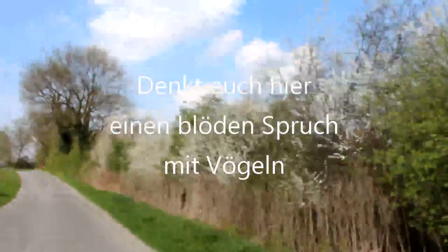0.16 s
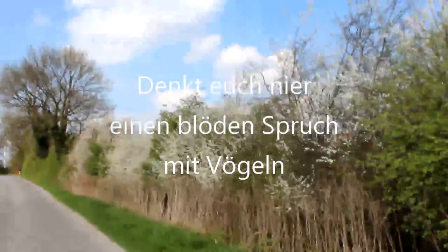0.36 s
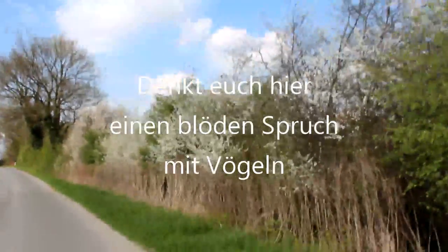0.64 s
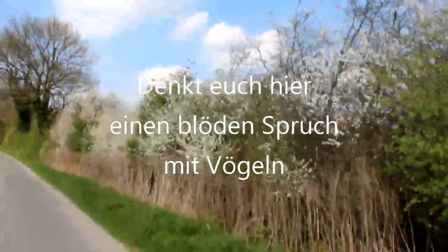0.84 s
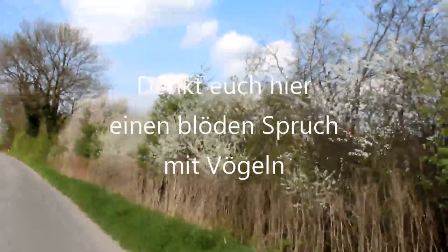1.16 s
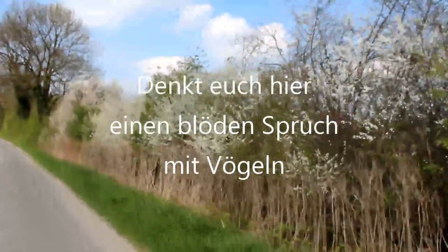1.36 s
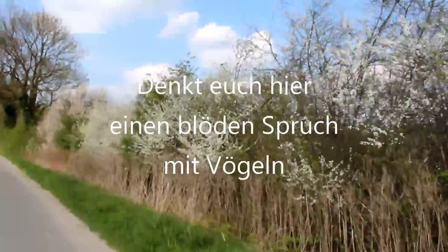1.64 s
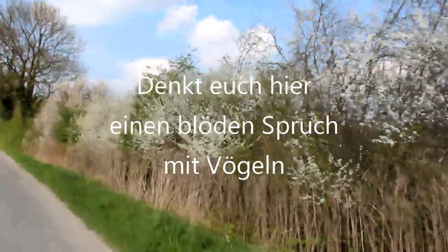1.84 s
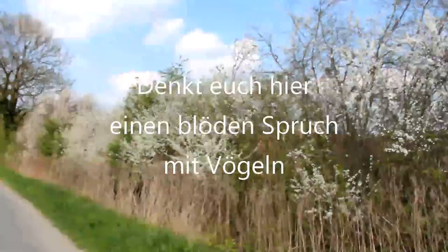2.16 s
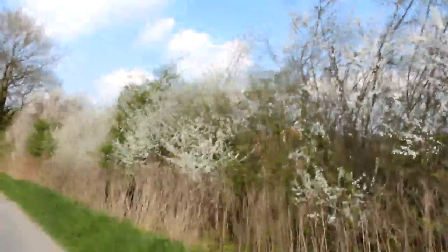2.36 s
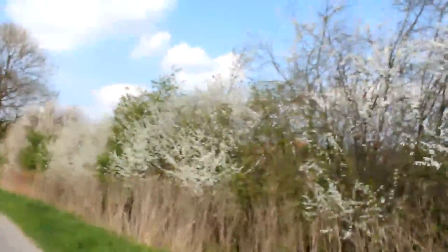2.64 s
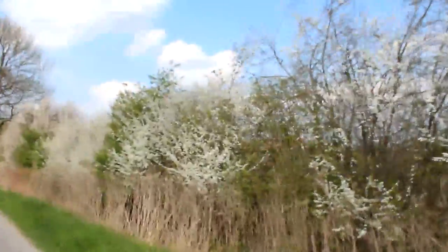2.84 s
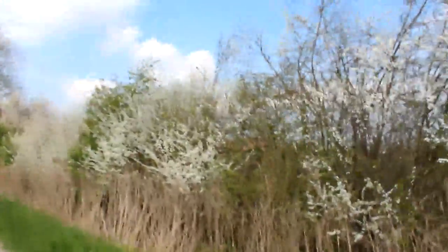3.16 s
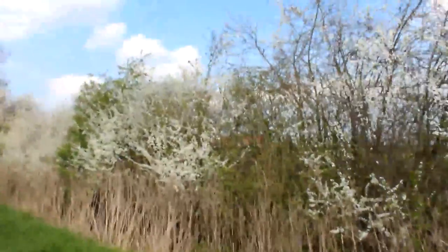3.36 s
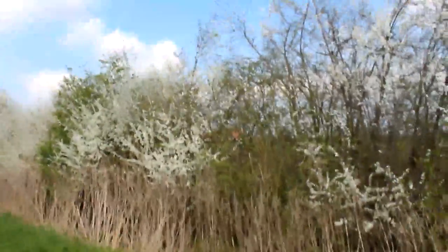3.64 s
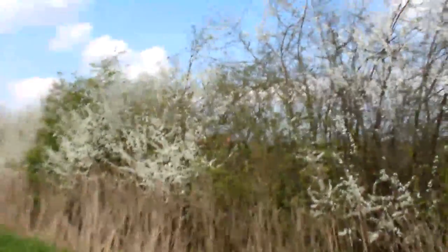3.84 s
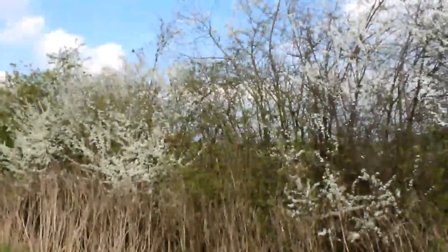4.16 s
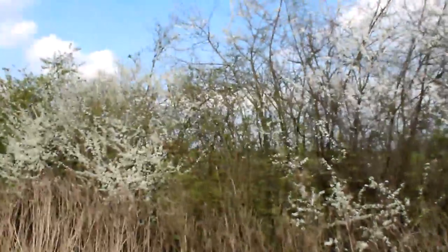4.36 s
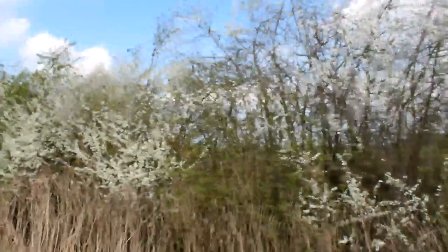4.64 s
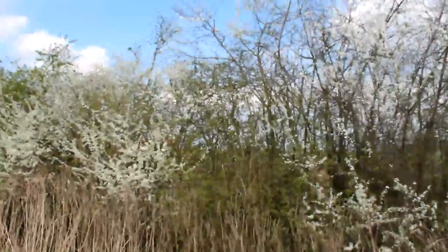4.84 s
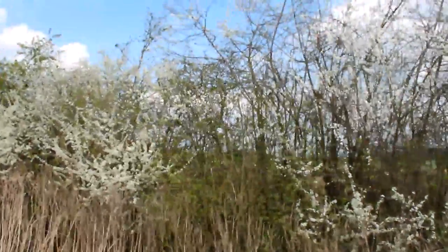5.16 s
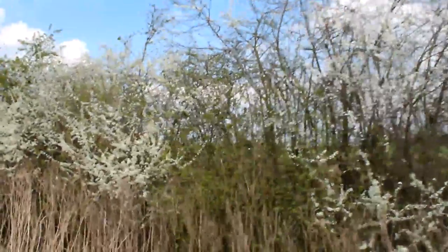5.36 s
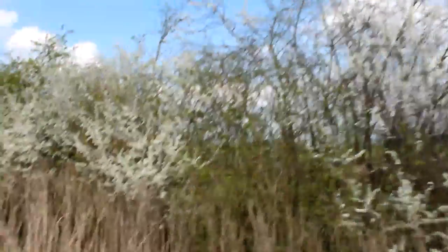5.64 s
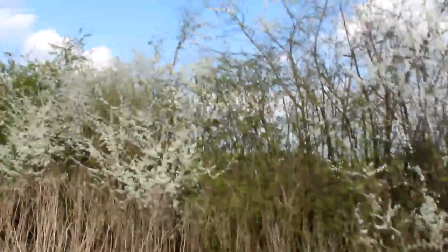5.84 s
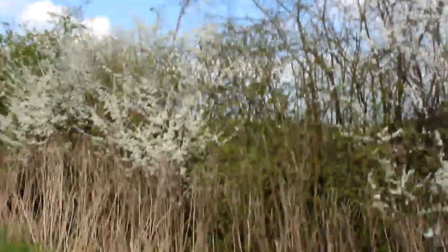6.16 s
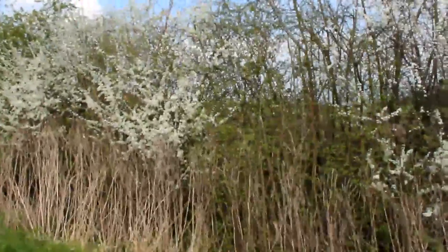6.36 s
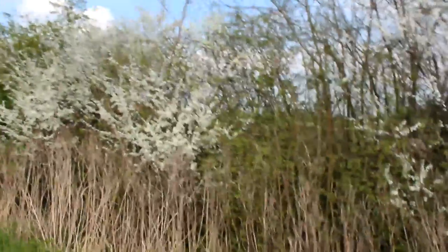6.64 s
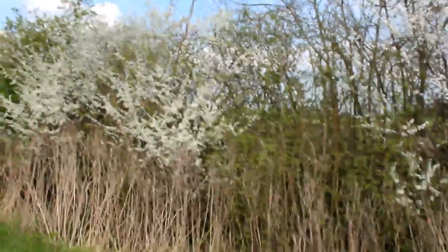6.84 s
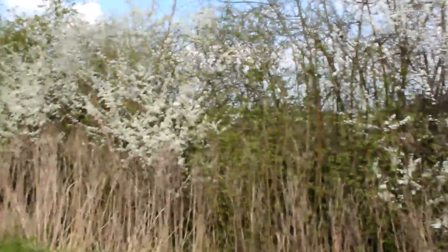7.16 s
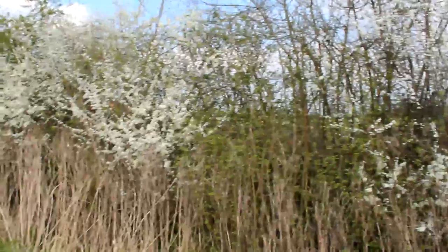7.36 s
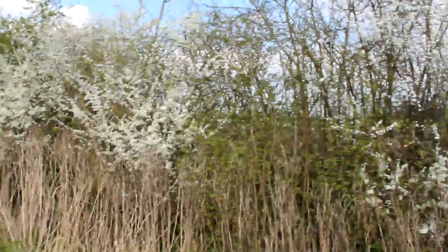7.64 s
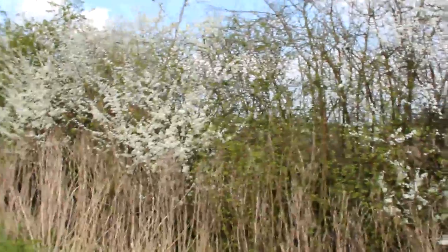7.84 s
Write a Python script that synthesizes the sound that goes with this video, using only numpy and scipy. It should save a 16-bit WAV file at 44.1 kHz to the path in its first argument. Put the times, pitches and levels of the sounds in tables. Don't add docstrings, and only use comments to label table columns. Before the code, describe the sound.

A small group of sparrows chatters irregularly in a hedge, thin whistled chirps slightly blurred by twigs. At first, rumbling wind puffs hit the microphone hard and partly cover quiet birds. After about four seconds the air calms and stronger chirps stand out, with dull handling bumps, fingernail-like taps, tiny snaps and soft brushing of leaves. Dry reeds hiss very softly above a distant low hum. Close, open, handheld sound.

```python
import sys
import numpy as np
from scipy import signal
from scipy.fft import rfft, irfft, next_fast_len
from scipy.io import wavfile
from scipy.ndimage import uniform_filter1d

SR = 44100
rng = np.random.default_rng(int(sys.argv[2]) if len(sys.argv) > 2 else 0)


def field_ratio(decibels):
    return 10 ** (np.asarray(decibels, dtype=float) / 20)


def generate_wav(sig):
    pcm = np.round(np.clip(np.atleast_2d(sig).T, -1, 1) * 32767).astype(np.int16)
    wavfile.write(sys.argv[1], SR, pcm)


N = 352888

# [t after start/s, f/Hz, effort/dB]
HUMP = [
    [(-.005, 2007, -21), (.01, 2565, -17.5), (.022, 3353, -4.5), (.033, 3530, 4.5), (.045, 3440, -5.5),
     (.052, 2645, -7.5), (.062, 2874, -8.5), (.08, 2663, -7.5), (.097, 2004, -15)],
    [(.016, 3300, -16), (.033, 4165, -5.5), (.047, 3940, -11)],
]
TWIN_PEAK = [
    [(.005, 2940, -28), (.02, 4200, 1.5), (.033, 5080, -4), (.045, 3923, 4), (.057, 3765, -12)],
    [(-.02, 4250, -19), (-.003, 4550, -17.5), (.01, 5670, -4)],
    [(-.015, 3450, -18), (.006, 4150, -24)],
    [(-.004, 2265, -23), (.008, 2920, -25)],
    [(.063, 2860, -17), (.078, 3410, -1.5), (.09, 3950, -5.5), (.102, 2873, -12), (.125, 3240, -13.5),
     (.16, 3070, -19.5)],
]
SPIKE = [
    [(.003, 3556, -14), (.035, 4406, -5.5), (.056, 4876, -10), (.062, 5880, -12.5), (.069, 4300, -4),
     (.09, 3815, 0), (.1, 3354, -12.5)],
]
SPIKE_TAIL = [
    [(.1, 3250, -5), (.13, 3352, -26), (.142, 3440, -4), (.153, 3967, -1.5), (.172, 4200, -1.5),
     (.195, 4220, -17)],
    [(.095, 4150, -26), (.12, 4030, -4), (.145, 4260, -13)],
]
ZIGZAG = [
    [(.005, 2920, -4.5), (.025, 4850, 7), (.043, 5460, -13.5), (.06, 3886, 8), (.075, 3060, -1.5),
     (.088, 2620, -16)],
    [(-.028, 5050, -13), (-.01, 5680, -13), (.006, 5970, -6.5)],
    [(.092, 2656, -2.5), (.11, 3640, 7), (.127, 4700, -3), (.137, 3100, 3), (.155, 2450, -8)],
]
ARCH_STEP = [
    [(.005, 2840, -14), (.02, 4040, 5.5), (.035, 4637, 3), (.05, 3705, 3.5), (.062, 2863, -10),
     (.08, 3094, 4), (.1, 3020, -18), (.125, 2380, -14.5)],
    [(-.024, 4400, -9), (-.003, 4450, -9), (.012, 5670, -2)],
    [(-.02, 5100, -12), (0, 5360, -9)],
    [(-.024, 2220, -28), (0, 2470, -16)],
]
CASCADE = [
    [(.003, 3424, -22), (.013, 4590, -12), (.024, 5100, -8), (.032, 3715, -10.5), (.038, 4180, -7.5),
     (.045, 3100, -23)],
    [(.048, 3270, -6), (.06, 4010, -4), (.075, 3350, -4.5), (.082, 2713, -14.5), (.09, 3010, -7.5),
     (.1, 2860, -17), (.12, 2220, -21.5)],
]
TOOTH = [
    [(-.03, 4450, -19), (-.005, 5420, -8.5), (.02, 7800, -18)],
    [(.003, 2800, -13), (.02, 4340, 3), (.033, 4450, 3), (.042, 5150, -3.5), (.055, 3700, 5.5)],
    [(-.012, 2680, -17), (.02, 2730, -20), (.042, 3370, -9), (.055, 2870, -11)],
]
RATTLE = [
    [(.002, 3788, -3), (.01, 4670, -1), (.028, 4350, -1), (.033, 3115, -7.5), (.041, 4110, 0),
     (.048, 2940, -4)],
    [(.05, 2876, -23), (.055, 2150, -16.5), (.06, 3114, -6.5), (.08, 3965, -0.5), (.086, 4400, -1),
     (.092, 2664, -18), (.102, 3560, -8.5), (.112, 3100, -10), (.125, 2900, -16)],
]
SHOULDER = [
    [(.005, 3120, -15.5), (.015, 4000, -13.5), (.038, 4600, -8), (.042, 5280, -20.5), (.048, 3670, -6.5),
     (.067, 3230, -27)],
    [(.077, 2900, -13.5), (.098, 3856, -8), (.115, 3090, -10), (.13, 2320, -20)],
]
HOOK = [
    [(.002, 2953, -8), (.01, 4250, -0.5), (.028, 3870, 0), (.045, 3280, -1), (.05, 4270, 4),
     (.058, 2700, -7), (.078, 2840, -1), (.092, 3500, 4.5)],
    [(.1, 2990, -3), (.135, 3480, -12), (.16, 2960, -6.5)],
    [(.052, 4590, -7), (.085, 3760, -3.5)],
]
FLICK = [
    [(.01, 3010, -14), (.025, 4250, -0.5), (.037, 4650, -5.5), (.043, 2950, -4), (.06, 3350, -4),
     (.08, 3020, -7)],
]
DROP = [
    [(.015, 3290, 0), (.021, 5110, -1.5), (.055, 4140, -5), (.065, 2880, -3.5), (.09, 3100, -6),
     (.12, 3280, 0)],
]
STAIRS = [
    [(.015, 3250, -5), (.03, 4070, -2), (.045, 3510, -5.5), (.05, 4620, 0), (.056, 2930, -8),
     (.075, 3000, -3.5), (.095, 2850, -12.5), (.14, 2760, -25)],
    [(.097, 2530, -13), (.115, 2150, -19), (.14, 2090, -23)],
    [(-.002, 4830, -14), (.012, 5570, -10), (.019, 5950, -14)],
]
TRILL = [
    [(.005, 3290, -10), (.02, 4500, -2), (.034, 5540, -8), (.048, 5720, -9), (.058, 3450, 4),
     (.075, 5460, -2)],
    [(.08, 3300, 2), (.095, 4830, -0.5), (.13, 4790, -6)],
    [(.1, 5170, -2.5), (.17, 5074, -13)],
    [(.008, 3100, -12), (.022, 3950, -5), (.036, 4100, -10)],
]
LEDGE = [
    [(0, 3440, -8), (.01, 5120, 6.5), (.025, 4920, -20), (.032, 6070, -9), (.042, 4200, -8),
     (.07, 3770, -6)],
]
DOUBLE_BOW = [
    [(.005, 3695, -1), (.028, 3750, -1.5), (.042, 2730, -2)],
    [(.05, 2860, -3), (.065, 3400, -2), (.08, 2790, -4), (.1, 2830, -21)],
]
SAWTOOTH = [
    [(.008, 2800, -11.5), (.022, 3940, -1.5), (.037, 4270, -8), (.042, 4700, -4), (.052, 3290, 2.5)],
    [(.022, 2710, -14), (.036, 3170, -5), (.042, 3800, 2.5), (.047, 3100, -1), (.06, 2750, -11)],
]
ARCH = [
    [(0, 2690, -10), (.02, 3250, -8), (.035, 3680, -2.5), (.058, 3770, -1.5), (.08, 3520, -2),
     (.1, 3100, -12), (.115, 2820, -3), (.132, 2580, -12)],
]
PAIR = [
    [(0, 3635, -8), (.025, 4460, 6)],
    [(0, 4500, -4), (.025, 5320, 3)],
]
WARBLE = [
    [(0, 5950, -4), (.012, 6200, -3), (.035, 5900, -5), (.045, 6150, -6), (.062, 6660, 0), (.095, 6250, -7),
     (.11, 6520, -3), (.14, 6600, -10)],
    [(.088, 5550, 5), (.1, 5910, 4), (.135, 5900, -15)],
]
LEAP = [
    [(0, 2300, -25), (.014, 3790, -1), (.028, 4270, 2.5), (.034, 4680, -5), (.042, 3710, 4),
     (.052, 3570, 1.5), (.057, 2910, -7.5), (.085, 2820, -8.5), (.105, 2470, -9)],
    [(-.025, 4150, -19), (-.005, 4100, -10), (.006, 4580, -10), (.013, 5900, -11)],
    [(-.02, 4670, -18), (.008, 5200, -13)],
]
CROOK = [
    [(0, 2752, -9), (.012, 3460, 3), (.022, 4140, -4), (.033, 4500, -7), (.047, 2710, -16.5)],
]
LEAN = [
    [(0, 4000, -2), (.015, 5260, 2), (.04, 5800, -5), (.052, 3760, 5)],
]


def rms_one(x):
    return x / np.sqrt(np.mean(x ** 2) + 1e-20)


def drift(rate_hz):
    r = np.exp(-2 * np.pi * rate_hz / SR)
    noise = rng.standard_normal(N + SR)
    return rms_one(signal.lfilter([1], [1, -2 * r, r * r], noise)[SR:])


def coloured(spectrum, patchy_db=0, rate_hz=10):
    size = next_fast_len(N, True)
    hz = np.maximum(np.arange(size // 2 + 1) * SR / size, 1)
    at, db = np.transpose(spectrum)
    shaped = rfft(rng.standard_normal(size)) * field_ratio(np.interp(np.log(hz), np.log(at), db))
    octave = np.log2(hz / 30)
    together = drift(rate_hz / 2)
    out = 0
    for k in range(int(np.log2(at[-1] / 30)) + 2):
        share = np.cos(np.pi / 2 * np.clip(octave - k, -1, 1)) ** 2
        band = irfft(shaped * share, size)[:N]
        out = out + band * field_ratio(patchy_db * (0.51 * together + drift(rate_hz)))
    return rms_one(out)


def syllables():
    # [syllable, list of (t/s, level/dB,
    # pitch factor if any)]
    song = [(HUMP, [(.423, -38.5), (.648, -39.5), (5.014, -36), (5.305, -32), (5.5, -29.5)]),
            (TWIN_PEAK, [(.875, -35), (1.221, -33.5), (5.76, -27)]), (SPIKE, [(1.498, -28), (1.718, -34.5),
            (5.181, -30.5), (6.08, -25.5)]), (SPIKE_TAIL, [(1.498, -30.5), (6.08, -27)]),
            (ZIGZAG, [(2.181, -41, 0.98), (2.521, -38), (6.47, -37)]), (ARCH_STEP, [(3.31, -35, 0.96),
            (3.575, -35, 0.95)]), (CASCADE, [(2.074, -35), (6.83, -26, 0.98), (6.943, -29, 0.99)]),
            (TOOTH, [(.109, -39, 1), (2.885, -37.5, 0.99)]), (SAWTOOTH, [(.167, -40, 1.0), (.22, -37, 0.92),
            (.27, -49, 1.03), (.313, -49, 0.97), (2.943, -37.5, 1.06), (2.998, -38, 1.05)]),
            (RATTLE, [(4.22, -33, 0.97), (4.565, -31.5)]), (SHOULDER, [(4.03, -35, 0.94), (4.37, -21)]),
            (CROOK, [(6.317, -41.5), (7.315, -38.5)]), (LEAN, [(7.245, -41.5)]),
                  (HOOK, [(7.52, -32.5), (7.922, -33.5)]), (FLICK, [(3.72, -36.5)]), (DROP, [(2.38, -42)]),
                  (STAIRS, [(1.83, -33.5)]), (TRILL, [(4.68, -35)]), (LEDGE, [(1.39, -44.5)]),
                  (DOUBLE_BOW, [(3.05, -40)]), (ARCH, [(2.718, -41)]), (WARBLE, [(1.03, -57)]),
                  (LEAP, [(4.895, -36)]), (PAIR, [(.411, -46.5), (.638, -45.5), (5.293, -44),
                  (5.488, -40)])]
    sung = []
    for paths, times in song:
        for s, db, *pitch in times:
            for path in paths:
                sung.append(np.array(path) * [1, np.prod(pitch), 1] + [s, 0, db])
    return sung


def peaked_calls():
    # [t/s, climb/s, foot f/Hz, top f/Hz, level/dB]
    peaks = [(0.334, 0.022, 3600, 5000, -56), (0.944, 0.028, 3000, 4510, -39.5),
             (4.089, 0.014, 3847, 5050, -48), (4.119, 0.017, 3300, 4560, -38.5),
             (7.135, 0.04, 3296, 5320, -37), (7.233, 0.033, 2970, 4150, -36.5)]
    fall_share, foot_db = 0.27, -2.5
    return [np.array([(s, foot, db + foot_db), (s + climb, top, db),
                      (s + climb * (1 + fall_share), foot, db + foot_db)])
            for s, climb, foot, top, db in peaks]


def bowed_calls():
    # [t/s, length/s, foot f/Hz, top f/Hz, level/dB]
    bows = [(0.588, 0.038, 2490, 3410, -52), (3.364, 0.035, 5270, 6230, -42),
            (5.553, 0.044, 3530, 4510, -40), (5.596, 0.042, 2740, 3460, -42.5),
            (5.854, 0.047, 5400, 6000, -56), (5.933, 0.0268, 5420, 5170, -35.5),
            (6.658, 0.0323, 1890, 2136, -54), (6.661, 0.028, 3770, 4200, -49)]
    end_db = 1.5
    u = np.linspace(0, 1, 9)
    return [np.c_[s + u * length, foot + (top - foot) * 4 * u * (1 - u), db + end_db * (2 * u - 1) ** 2]
            for s, length, foot, top, db in bows]


def sliding_calls():
    # [t/s, length/s, start f/Hz, end f/Hz, level/dB]
    slides = [(0.577, 0.021, 3500, 4230, -54.5), (1.336, 0.059, 5830, 4760, -62),
              (1.667, 0.019, 4450, 4940, -45), (3.437, 0.063, 5200, 5670, -50.5),
              (3.7, 0.024, 2450, 2620, -59), (4.423, .06, 1400, 1330, -65), (4.659, 0.06, 1350, 1250, -65),
              (5.13, 0.042, 4270, 2620, -58), (5.297, 0.069, 3960, 4420, -36),
              (6.248, 0.043, 5160, 5260, -49), (5.8, 0.026, 4250, 3100, -39),
              (6.987, 0.026, 3150, 3040, -58), (6.279, 0.018, 4250, 2850, -40),
              (6.301, .02, 3150, 2950, -53), (7.176, 0.012, 8100, 5760, -46),
              (7.09, 0.015, 5700, 7550, -66), (7.813, 0.023, 5600, 7600, -57.5),
              (7.819, 0.026, 2600, 3350, -57), (6.608, 0.036, 4930, 3060, -44.5),
              (6.648, 0.0394, 3050, 2420, -52), (7.066, 0.015, 8060, 5800, -74.5)]
    return [np.array([(s, start, db), (s + length, end, db)]) for s, length, start, end, db in slides]


def strokes():
    sung = syllables() + peaked_calls() + bowed_calls() + sliding_calls()
    return sorted(sung, key=lambda path: path[0, 0])


def lead_in(length, base_hz=1000, rise=0.4):
    u = np.linspace(0, 1, round(length * SR))
    hz = base_hz * rng.uniform(.9, 1.3) * (1 + rise * (1 + rng.random()) / 2 * u ** 2)
    phase = 2 * np.pi * np.cumsum(hz) / SR
    phase += np.cumsum(rng.normal(0, .04, len(u)))
    throat_db = [-13, -14, 0, -3, -14, -20, -22]
    stack = sum(field_ratio(db + rng.normal(0, 4.0)) * np.sin(k * phase) for k, db in enumerate(throat_db, 2))
    return stack * np.sin(np.pi * u)


def burr(hz, at):
    rate_hz = 105 * rng.uniform(.85, 1.0)
    burr_hz = hz * 1.2 * (1 + .14 * np.sin(2 * np.pi * rate_hz * at / SR))
    lowness = np.clip((3600 - hz) / 600, 0, 1)
    return field_ratio(-3.5) * lowness * np.sin(2 * np.pi * np.cumsum(burr_hz) / SR)


def whistles(wobble=0.0043, hoarse_db=-20, lead_db=-45, rasp_db=-37):
    overtones_db = [-27.5, -33.5, -45]
    # [f/Hz, level/dB per Hz]
    rasp = [(1800, -42), (4000, 33.5), (6500, 19), (12000, 13), (15700, 8)]
    partner_db, flutter_db = -9, 2.2
    edge_s, rounding_s = .008, 0.0019
    tremble_hz, tremble_depth = 72, 0.065
    out, effort, last_end = np.zeros(N), np.zeros(N), 0
    pitch_slip = 1 + wobble * drift(187)
    flutter = field_ratio(flutter_db * drift(161))
    ragged = .55 * drift(300)
    unsteady = flutter * (1 + field_ratio(hoarse_db) * drift(390))
    for times, path_hz, path_db in map(np.transpose, strokes()):
        times = np.sort(times)
        s, length = times[0], times[-1] - times[0]
        start_hz, db = path_hz[0], path_db.max()
        at = np.arange(round((s - edge_s) * SR), min(round((s + length + edge_s) * SR), N - 500))
        u = (at / SR - s) / length
        level_db = np.interp(at / SR, times, path_db)
        hz = uniform_filter1d(np.interp(at / SR, times, path_hz), size=int(rounding_s * SR) + 1)
        near_and_long = db > -46 and length > .035 and len(times) != 8
        low_end = path_hz[-1] < 3300 and near_and_long and start_hz > 1500
        if low_end:
            shake = np.sin(2 * np.pi * tremble_hz * at / SR)
            hz *= 1 + tremble_depth * np.clip(u, 0, 1) ** 1.6 * shake
        phase = 2 * np.pi * np.cumsum(hz * pitch_slip[at]) / SR
        edges = np.clip((.5 - np.abs(u - .5)) * length / edge_s / 2 + .5, 0, 1)
        swell = field_ratio(level_db + 10.5) * np.sin(np.pi / 2 * edges) ** 2 * unsteady[at]

        upper = sum(field_ratio(o) * np.sin(k * phase + ragged[at]) for k, o in enumerate(overtones_db, 2))
        upper *= field_ratio(0.4 * (db - level_db))
        upper *= field_ratio(3.74 * np.clip((3900 - hz) / 800, 0, 1))
        out[at] += swell * (np.sin(phase) + upper)

        other = phase + rng.uniform(0.0504, 0.3) * 2 * np.pi * np.cumsum(4300 - hz) / SR
        late = rng.integers(300, 490)
        out[at + late] += field_ratio(partner_db) * swell * (np.sin(other) + field_ratio(-41.5) * np.sin(other + phase))
        if low_end:
            out[at] += swell * np.clip(u, 0, 1) * burr(hz, at)
        effort[at] += swell ** 2

        if s - last_end > .04 and start_hz < 3450 and db > -42:
            buzz = field_ratio(lead_db + 0.44 * (db + 42.5)) * lead_in(length=0.038)
            end = at[0] + 300
            before = slice(end - len(buzz), end)
            out[before] += buzz * unsteady[before]
            effort[before] += field_ratio(46.0) * buzz ** 2
        last_end = max(last_end, s + length)
    airflow = np.abs(uniform_filter1d(effort, size=700)) ** 0.22
    return out + field_ratio(rasp_db) * airflow * coloured(rasp, patchy_db=3.0, rate_hz=45)


def hedge(x, far_db=-28, far_t60=0.8):
    t = np.arange(1, SR // 2) / SR
    near_db, near_t60 = -4, .1
    near, far = rng.standard_normal((2, len(t)))
    echo = field_ratio(near_db) * rms_one(near * field_ratio(-60 * t / near_t60))
    echo += field_ratio(far_db) * rms_one(far * field_ratio(-60 * t / far_t60))
    return x + signal.fftconvolve(x, echo / np.sqrt(len(t)))[:N]


def rustles():
    # [t/s, length/s, level/dB]
    brushes = [
        (3.968, 0.078, -47),
        (4.17, .06, -48),
        (7.097, 0.13, -42),
        (7.197, 0.12, -43),
        (7.751, 0.041, -50),
        (7.793, 0.079, -49),
        (7.862, 0.068, -47),
    ]
    # [f/Hz, level/dB per Hz]
    leaves = [(900, -26), (2500, 6), (6000, -4), (11000, -8), (15700, -17)]
    t = np.arange(N) / SR
    level = sum(field_ratio(db) * np.sin(np.pi * np.clip((t - s) / length, 0, 1)) for s, length, db in brushes)
    return level * coloured(leaves, patchy_db=6.0, rate_hz=66)


def gusts(lumps_db=6.0, lump_hz=35):
    # [t/s, length/s, level/dB]
    puffs = [(0, 0.26, -23.5), (0.263, 0.21, -21.5), (0.48, 0.37, -31), (0.66, 0.26, -34.5),
             (0.936, 0.12, -25), (1.002, 0.16, -29.5), (1.348, 0.038, -28), (1.466, 0.15, -27),
             (1.536, 0.17, -34.5), (2.086, 0.15, -31.5), (2.242, 0.14, -33.5), (2.375, 0.1, -24),
             (2.473, 0.21, -34.5), (2.792, 0.15, -39), (2.906, 0.22, -20.5), (3.102, 0.23, -34.5),
             (3.374, 0.052, -31), (3.44, 0.2, -26.5), (3.752, 0.23, -31.5), (3.855, 0.078, -18.5),
             (3.927, 0.18, -23.5), (5.898, 0.041, -42.5), (6.032, 0.12, -32.5)]
    # [f/Hz, level/dB per Hz]
    buffet = [(12, -38), (20, -21), (65, -0.5), (135, -2), (195, -3.5), (461, -34.5), (900, -43),
              (1170, -47), (1980, -120)]
    port_top = .2
    t = np.arange(N) / SR
    level = sum(field_ratio(db) * np.sqrt(np.sin(np.pi * np.clip((t - s) / length, 0, 1)) + 1e-9)
                for s, length, db in puffs)
    flutter = np.clip(drift(61.7), -3, 1.6)
    push = level * field_ratio(6.0 * flutter - 6.5) * coloured(buffet, patchy_db=lumps_db, rate_hz=lump_hz)
    return port_top * np.tanh(push / port_top)


def eddies():
    # [t/s, peak level/dB, f/Hz]
    thumps = [(0.024, -16, 105), (0.093, -12, 142), (0.16, -28, 132), (0.231, -17, 172), (0.311, -17.5, 86),
              (0.41, -24, 97.3), (0.599, -19, 115), (0.7, -15.5, 145), (0.816, -19, 79), (1.018, -25, 65),
              (1.072, -16, 187), (1.14, -24, 95), (1.348, -25.5, 119), (1.51, -24, 71.5),
              (1.552, -21.5, 89), (2.107, -12, 134), (2.169, -26, 78), (2.299, -19.5, 170.7),
              (2.428, -22, 135), (2.907, -26, 87.7), (2.939, -17.5, 150), (3.181, -27.5, 130),
              (3.262, -29, 78.1), (3.381, -22, 132), (3.451, -22, 93), (3.52, -25, 145), (3.796, -29, 53.8),
              (3.877, -13.5, 132)]
    swell_cycles, trim_db = 0.91, -6
    out, t = np.zeros(N + SR), np.arange(SR // 5) / SR
    for (s, db, hz), turn in zip(thumps, rng.random(len(thumps))):
        u = t * hz / swell_cycles
        wave = np.sin(2 * np.pi * (turn + hz * t * (1.2 - 0.0793 * u)))
        out[round(s * SR):][:len(t)] += field_ratio(db + trim_db) * u * np.exp(1 - u) * wave
    return out[:N]


def knocks(dull_db=-6):
    # [t/s, peak level/dB, body f/Hz, t60/s]
    shifts = [
        (0.536, -31, 301, 0.025),
        (2.032, -31.5, 490, 0.24),
        (4.887, -30.5, 920, 0.26),
        (6.017, -29, 1000, 0.25),
        (6.079, -27.5, 690, 0.4),
        (5.832, -30.5, 484, 0.05),
        (7.538, -31, 242, 0.068),
        (7.673, -29, 212, .06),
    ]
    out, t = np.zeros(N + SR), np.arange(SR // 5) / SR
    for s, db, hz, t60 in shifts:
        burst = rng.standard_normal(len(t)) * field_ratio(db - 60 * t / max(t60, .01))
        shell_band = signal.butter(1, [hz / 1.29, hz * 1.0], "band", fs=SR, output="sos")
        dull_band = signal.butter(2, [150, 2200], "band", fs=SR, output="sos")
        shell = signal.sosfilt(shell_band, burst)
        dull = signal.sosfilt(dull_band, burst)
        out[round(s * SR):][:len(t)] += 3 * shell + field_ratio(dull_db) * dull
    return out[:N]


def taps():
    # [t/s, peak level/dB, shell f/Hz]
    nail_taps = [(5.2074, -25.5, 230), (5.214, -21, 280), (6.2282, -22, 333), (6.237, -32, 303),
                 (5.25, -30.5, 295), (6.285, -27.5, 234), (7.1659, -27.5, 247)]
    shell_t60, edge_t60 = 0.027, 0.0085
    edge_hz, edge_db = 1770, -0.5
    out, t = np.zeros(N + SR), np.arange(SR // 10) / SR
    for s, db, hz in nail_taps:
        shell = np.sin(2 * np.pi * hz * t) * field_ratio(-60 * t / shell_t60)
        edge = np.sin(2 * np.pi * edge_hz * t) * field_ratio(edge_db - 60 * t / edge_t60)
        out[round(s * SR):][:len(t)] += field_ratio(db) * (shell - edge)
    return out[:N]


def stem_snaps(trim_db=1.0):
    # [t/s, peak level/dB]
    snaps = [(.781, -42), (2.6935, -40), (3.112, -42), (3.9931, -36), (4.1105, -40), (5.117, -40),
             (7.374, -45), (7.793, -39)]
    out, t = np.zeros(N + SR), np.arange(SR // 5) / SR
    for s, db in snaps:
        out[round(s * SR):][:len(t)] += rng.standard_normal(len(t)) * field_ratio(db + trim_db - 60 * t / .008)
    return out[:N]


def breeze(level_db=-48):
    # [f/Hz, level/dB per Hz]
    reeds_and_hum = [(18, -26), (35, 6.5), (85, 6), (156, -2), (389, -1), (1870, -11), (2920, -9.5),
                     (3600, -9.5), (4210, -12.5), (6230, -18.5), (15600, -26)]
    return field_ratio(level_db) * coloured(reeds_and_hum, patchy_db=2.0, rate_hz=54.0)


def scene():
    birds = hedge(whistles())
    wind = gusts() + eddies()
    hand = knocks() + taps()
    mix = birds + rustles() + wind + hand + stem_snaps() + breeze()
    return mix[None]


def top_cut(x):
    return signal.sosfilt(signal.butter(12, 15720, fs=SR, output="sos"), x)


def record(dry):
    low_pass = signal.cheby2(12, 60, 16150, fs=SR, output="sos")
    mix = signal.sosfilt(low_pass, dry)
    return top_cut(mix)


dry = scene()
out = record(dry)
generate_wav(out)
```